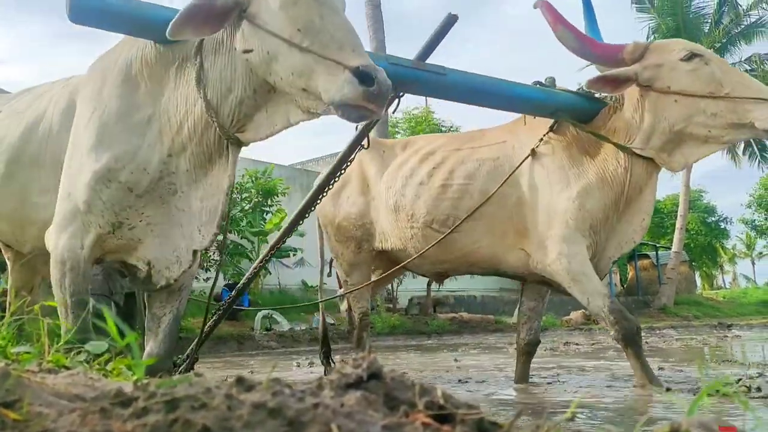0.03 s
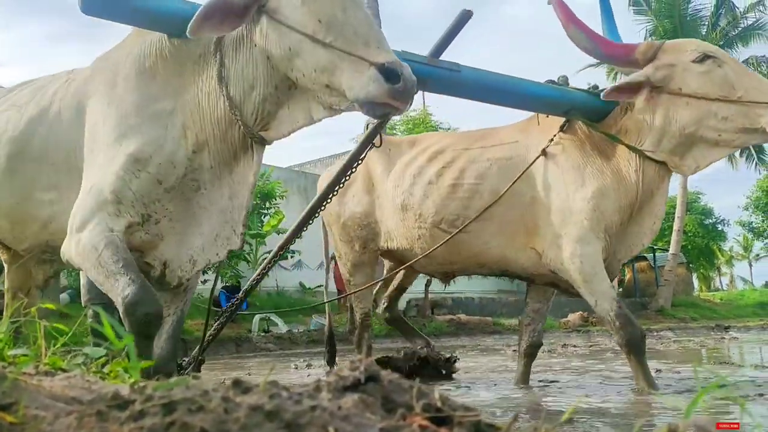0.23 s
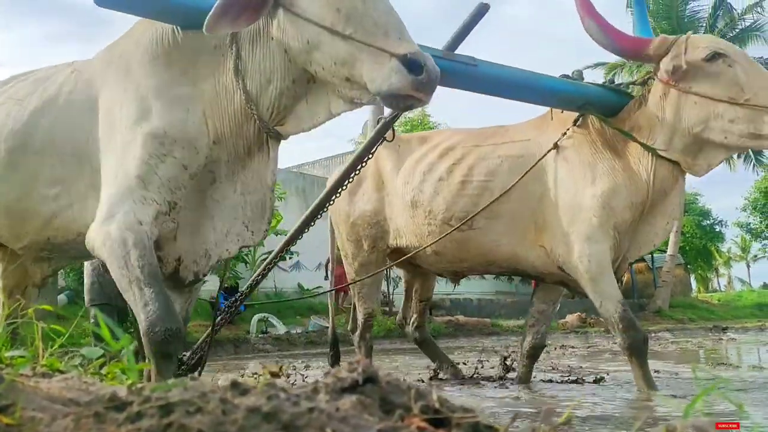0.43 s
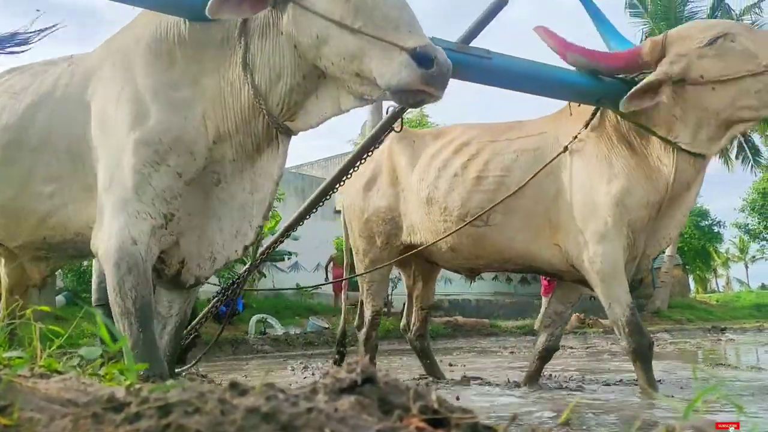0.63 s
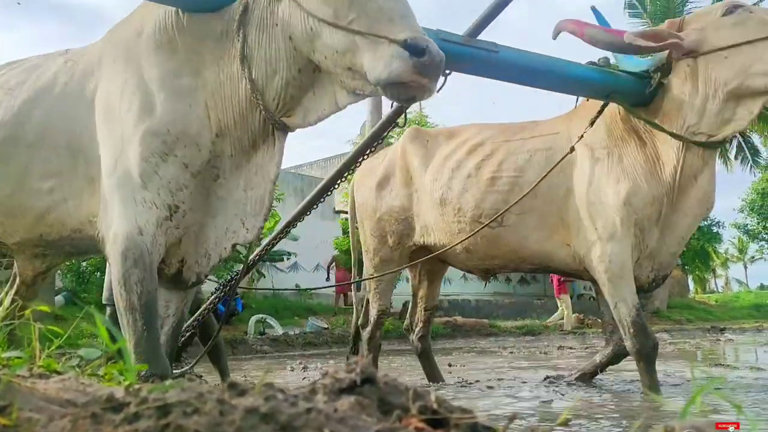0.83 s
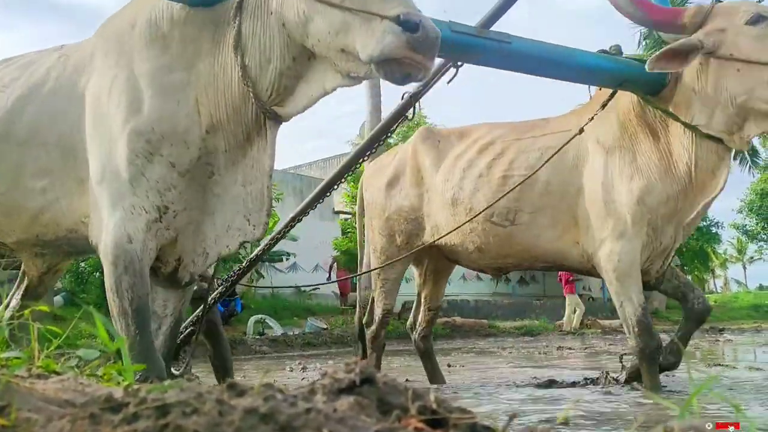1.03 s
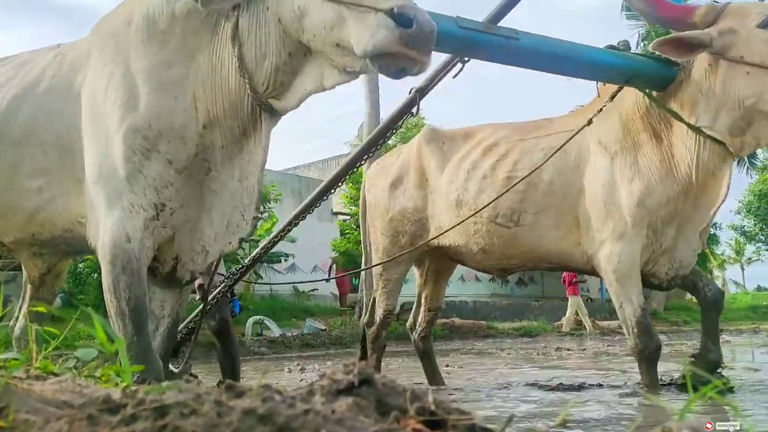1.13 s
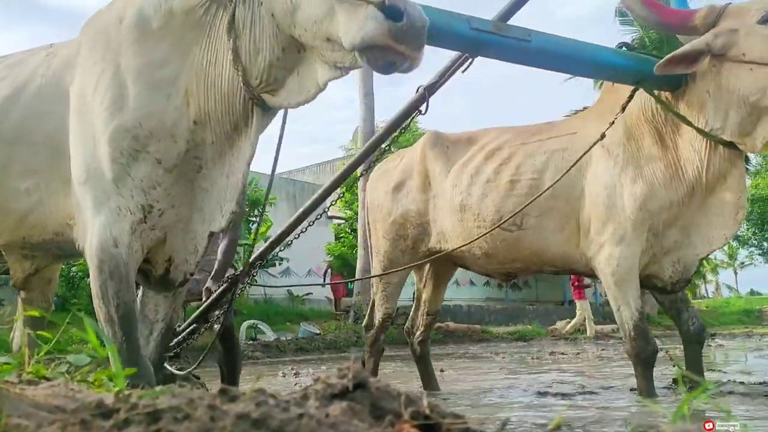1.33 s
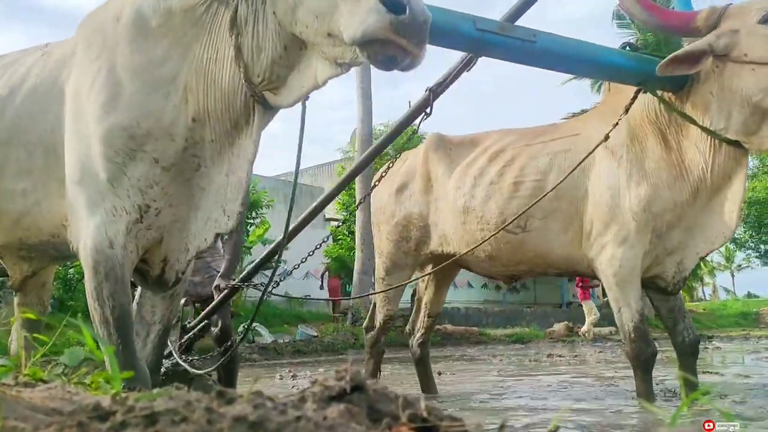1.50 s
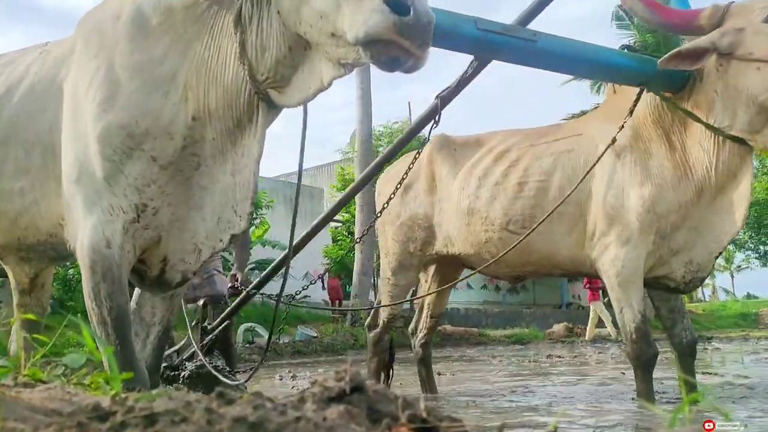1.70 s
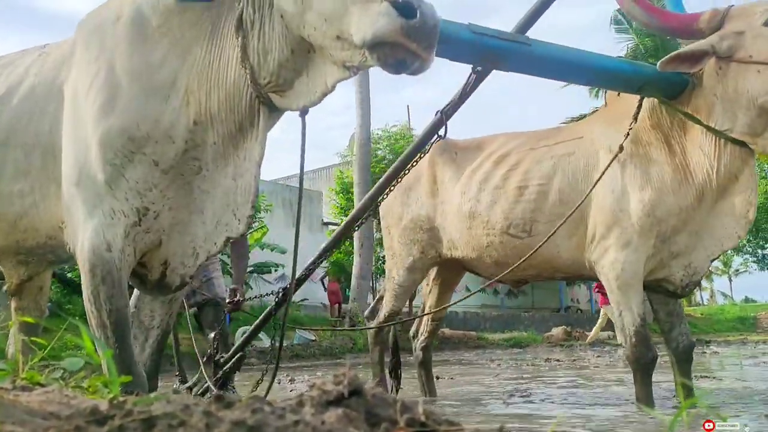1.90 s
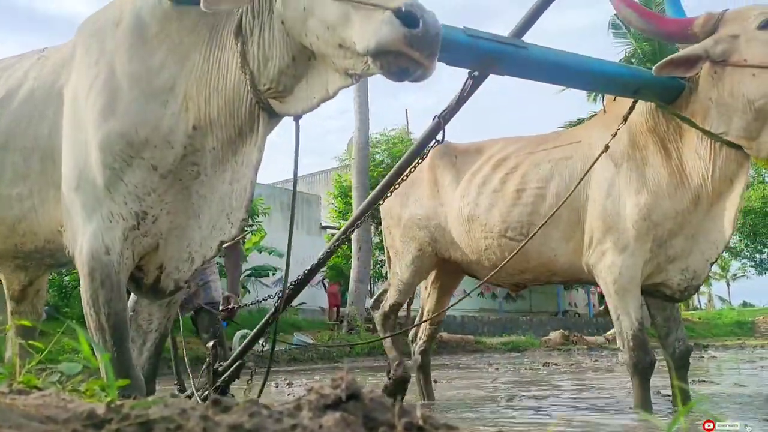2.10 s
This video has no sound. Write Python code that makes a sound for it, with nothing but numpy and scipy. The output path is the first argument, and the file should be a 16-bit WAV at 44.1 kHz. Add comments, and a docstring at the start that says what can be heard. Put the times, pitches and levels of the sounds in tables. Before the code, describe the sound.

Oxen step through watery mud with a gulping squelch, a dull knock and clinking chain.

```python
"""Yoked oxen in a flooded field

A hoof pulls out of mud: suction lets go in dull gulps, water sloshes back. The wooden yoke
knocks on its low modes; a soft low boop follows. Steel chain links clink and rub, wet mud slaps
down close by. Small plops over stirred water. Behind: high hiss on the left, a little wind."""
import sys
import numpy as np
from scipy import signal
from scipy.fft import rfft, irfft, next_fast_len
from scipy.io import wavfile
from scipy.ndimage import map_coordinates

SR = 44100
rng = np.random.default_rng(int(sys.argv[2]) if len(sys.argv) > 2 else 0)


def persist_wave(psi):
    """Save psi, clipped to +-1, as 16-bit WAV."""
    counts = np.round(np.clip(psi, -1, 1) * 32767).astype(np.int16)
    wavfile.write(sys.argv[1], SR, np.atleast_2d(counts).T)


N = 94815

# suction releases (time [s], level [dB], pitch [Hz])
GULPS = [(0.2388, -22.5, 504), (.2512, -15.5, 686), (0.258, -15.5, 419), (0.2622, -8, 502),
         (.268, -14.5, 546), (0.2776, -21, 430), (.298, -23.5, 713), (.475, -31.5, 556)]
# mud hollow resonances (centre [Hz], width [Hz], gain [dB])
HOLLOW_MODES = [(297, 41, 1), (496, 73, 0.5), (732, 76, -11), (1090, 45, -18), (1730, 330, -22)]
# returning water (frequency [Hz], gain [dB])
SLOSH_SPECTRUM = [(100, -46), (230, -18.5), (330, -3), (450, -5), (560, 1.5), (700, -1.5), (900, -19),
                  (3000, -52)]
# hoof spray (frequency [Hz], gain [dB])
SPRAY_SPECTRUM = [(300, -29), (1200, 17.5), (1800, 0), (2600, 4.5), (5400, -0.5), (8000, -5), (14700, -8),
                  (15300, -65)]
# wooden beam (frequency [Hz], gain [dB], t60 [s])
YOKE_MODES = [(165, -8.5, 0.13), (203.4, -18, 0.16), (296, -1.5, 0.082), (387, -10.5, 0.043),
              (470, -7, 0.1), (586, -18, 0.07), (814.5, -12.5, 0.083)]
# yoke impact noise (frequency [Hz], gain [dB])
THUD_SPECTRUM = [(100, -39), (220, 6), (400, 3.5), (1200, -11.5), (2000, -24), (3000, -32), (7500, -33),
                 (9000, -66.5)]
# link contacts (time [s], relative level [dB])
CLINKS = [(0.6571, -23), (1.05, -43), (1.825, -37.5), (1.884, -23.5), (1.8876, -18.5), (1.899, -28)]
# steel links (frequency [Hz], gain [dB], t60 [s])
LINK_MODES = [(2030, -21.5, 0.061), (4377, -23.5, 0.3), (5207, -3.5, 0.11), (5300, -7, 0.088),
              (5350, -16, 0.058), (5930, -20.5, 0.075), (7200, -18.5, 0.057), (7640, -31, 0.12)]
# link contact noise (frequency [Hz], gain [dB])
TICK_SPECTRUM = [(1000, -16.5), (2100, -17), (3000, -17.5), (4500, -1.5), (5900, -1.5), (6700, 3.5),
                 (7600, 1.5), (8400, -19.5)]
# links sliding (time [s], relative level [dB])
RUB_LEVEL = [(.62, -72), (.645, -38.5), (.67, -32), (.78, -72), (1.33, -69), (1.43, -50), (1.58, -43),
             (1.65, -52), (1.85, -45.5), (1.88, -23.5), (1.93, -41.5), (1.98, -47), (2.05, -66)]
# ring of sliding links (frequency [Hz], gain [dB])
RUB_SPECTRUM = [(4000, -38), (4380, -20.5), (4600, -35.5), (5020, -18.5), (5120, 1), (5230, -8),
                (5450, -12.5), (5800, -26), (8300, -46.5)]
# mud landings (time [s], level [dB], crack length [s], crack pitch [Hz])
SLAPS = [(1.4934, -16.5, 0.0028, 8820), (1.5397, -30.5, 0.0037, 8000), (1.5942, -16.5, 0.0036, 8450)]
# mud crack (frequency [x crack pitch], gain [dB])
CRACK_SPECTRUM = [(.12, -15.5), (.27, -22.5), (.48, -10), (.56, -13.5), (.66, -10), (.76, -12.5),
                  (.88, -10.5), (1, 5.5), (1.1, -4), (1.3, -7.5), (1.6, -12), (1.85, -31.5)]
# knock under each crack (frequency [Hz], gain [dB], t60 [s])
SLAP_MODES = [(342, -15, 0.029)]
# mud spatter (frequency [Hz], gain [dB])
SPATTER_SPECTRUM = [(300, -3.5), (1300, -12), (2300, 2), (2900, -6.5), (4000, -14), (15000, -25.5)]
# puddle plops; lowest row: soft boop just after the yoke's knock (time [s], level [dB], pitch [Hz])
PLOPS_AND_BOOP = [(.093, -37, 645), (.379, -33.5, 1047), (0.6, -36, 866), (.699, -37.5, 170.4),
                  (.867, -38.5, 820), (1.03, -38.5, 1145), (1.073, -33, 852), (1.152, -34.5, 993),
                  (1.513, -28.5, 940), (1.523, -29.5, 995), (1.583, -31, 920), (1.664, -40.5, 900),
                  (1.677, -36, 970), (1.7765, -29, 875), (1.827, -36.5, 396), (1.869, -33.5, 800),
                  (1.887, -31.5, 617)]
# splash around a plop (frequency [Hz], gain [dB])
SPLASH_SPECTRUM = [(150, -14), (350, 2), (1000, 2.5), (1500, -12.5), (2200, -10), (6000, -19), (8500, -58)]
# stirred water (time [s], level [dB])
WATER_LEVEL = [(0, -51), (.8, -51.5), (.97, -52.5), (1.12, -51.5), (1.33, -55.5), (1.5, -49), (1.72, -51.5),
               (1.88, -45.5), (2.02, -55), (2.15, -54.5)]
# water wash (frequency [Hz], gain [dB])
WASH_SPECTRUM = [(60, 0), (150, -9), (290, -8), (450, -8), (800, -1.5), (1050, -4.5), (1400, -17.5),
                 (2200, -16.5), (3000, -32.5), (7000, -36), (8300, -77.5)]
# high hiss (time [s], level [dB])
HISS_LEVEL = [(0, -50.5), (.2, -47.5), (.58, -46.5), (.85, -51), (1.17, -47.5), (1.45, -56), (1.68, -54),
              (1.8, -48.5), (2.15, -55.5)]
# hiss, left ear (frequency [Hz], gain [dB])
HISS_LEFT_SPECTRUM = [(1500, -10), (3000, -12), (3800, -3.5), (4500, 2.5), (5200, 0), (5900, -10),
                      (6500, -35), (7700, -22.5), (8200, -80.5)]
# hiss, right ear (frequency [Hz], gain [dB])
HISS_RIGHT_SPECTRUM = [(2000, -6.5), (4500, -11), (5900, -6.5), (7000, -1), (7700, -4.5), (8200, -69.5)]
# gusts (time [s], relative level [dB])
WIND_LEVEL = [(0, -49), (.35, -42), (.55, -54.5), (.77, -43.5), (1.25, -46.5), (1.38, -36.5), (1.46, -42.5),
              (1.85, -49.5), (1.98, -38), (2.15, -45.5)]
# wind rumble (frequency [Hz], gain [dB])
WIND_SPECTRUM = [(15, 5), (35, 7), (55, 2.5), (90, -7.5), (130, -11.5), (3000, -110)]
# echo off banks and a wall (frequency [Hz], t60 [s])
ECHO_DECAY = [(150, 0.19), (5000, .18), (9000, 0.095), (16000, 0.061)]


def amp(db):
    """Decibels to gain."""
    return 10 ** (np.asarray(db) / 20)


def unit(x):
    """Scale to rms 1."""
    return x / np.sqrt(np.mean(x ** 2) + 1e-20)


def along(points, hz):
    """Interpolate (frequency [Hz], value) on a log axis."""
    knots_hz, values = np.transpose(points)
    return np.interp(np.log(hz + 1), np.log(knots_hz + 1), values)


def clock():
    """Sample times [s]."""
    return np.arange(N) / SR


def curve(rows):
    """Interpolate (time [s], value) linearly."""
    return np.interp(clock(), *np.transpose(rows))


def wobble(rate_hz):
    """Smooth random curve with knots at rate_hz."""
    return map_coordinates(rng.standard_normal(1000), [clock() * rate_hz], mode="wrap")


def filtered(x, response):
    """Apply a complex frequency response."""
    size = next_fast_len(N + 8192)
    return irfft(rfft(x, size) * response(np.fft.rfftfreq(size, 1 / SR)), size)[..., :N]


def noise(spectrum, corr):
    """Coloured stereo noise, rms 1, left-right correlation corr."""
    mid, side = filtered(rng.standard_normal((2, N)), lambda hz: amp(along(spectrum, hz)))
    angle = np.arccos(np.clip(corr, -1, 1)) / 2
    mid, side = np.cos(angle) * mid, np.sin(angle) * side
    return unit(np.array([mid + side, mid - side]))


def pan(x, left_db, lead_ms=0):
    """Level and arrival difference; positive is left."""
    side = np.array([[.5], [-.5]])
    return filtered(x, lambda hz: amp(left_db * side) * np.exp(2j * np.pi * hz * side * lead_ms / 1000))


def add(track, start_s, sound):
    """Mix in at start_s."""
    part = track[..., round(start_s * SR):][..., :sound.shape[-1]]
    part += sound[..., :part.shape[-1]]


def fade(t60_s, attack_s):
    """Quick rise, exponential decay."""
    t = clock()[:SR // 3]
    return 1000 ** (-t / t60_s) * (1 - np.exp(-t / attack_s))


def bursts(rows, attack_s):
    """Envelope from (time [s], level [dB], t60 [s])."""
    envelope = np.zeros(N)
    for s, db, t60_s in rows:
        add(envelope, s, amp(db) * fade(t60_s, attack_s))
    return envelope


def ring(modes, scatter_db, detune, attack_s):
    """One randomised blow on modes (frequency [Hz], gain [dB], t60 [s])."""
    t = clock()[:SR // 3]
    blow = np.zeros(len(t))
    for (hz, db, t60_s), (gain_draw, pitch_draw) in zip(modes, rng.standard_normal((len(modes), 2))):
        tone = np.sin(2 * np.pi * hz * (1 + detune * pitch_draw) * t)
        blow += amp(db + scatter_db * gain_draw) * fade(t60_s, attack_s) * tone
    return blow


def echo(x, wet_db):
    """Add the field's short diffuse echo, different in each ear."""
    hz, t, spectra = signal.stft(rng.standard_normal((2, SR // 3)), SR, nperseg=256)
    decay = 1000 ** (-t / along(ECHO_DECAY, hz)[:, None])
    tail = signal.istft(spectra * decay, SR, nperseg=256)[1]
    tail /= np.linalg.norm(tail[0])
    return x + amp(wet_db) * signal.fftconvolve(np.atleast_2d(x), tail, axes=1)[:, :N]


def hoof(peak_s=0.26, rise_db_per_s=320, gulp_rise_s=0.0023, push_s=0.271, push_width_s=0.01):
    """Suction builds and lets go in gulps, the hollow churns, water sloshes back."""
    def swell(fall_db_per_s):
        t = clock() - peak_s
        onset = np.clip((clock() - .197) / 0.022, 0, 1)
        return amp(np.minimum(rise_db_per_s * t, -fall_db_per_s * t)) * onset

    def hollow(hz):
        return sum((-1) ** k * amp(db) * 1j * hz * width / (centre ** 2 - hz ** 2 + 1j * hz * width)
                   for k, (centre, width, db) in enumerate(HOLLOW_MODES))

    gulps, age_s = np.zeros(N), clock()[:SR // 20]
    envelope = (age_s / gulp_rise_s * np.exp(1 - age_s / gulp_rise_s)) ** 2
    for s, db, hz in GULPS:
        add(gulps, s, amp(db) * envelope * np.sin(2 * np.pi * hz * age_s))
    flow = noise([(1800, -13), (4000, -4.5)], corr=0.64)
    churn = amp(-21.5) * swell(460) * unit(filtered(flow, hollow))
    slosh = amp(-28 + 0.55 * wobble(70)) * swell(91.5) * noise(SLOSH_SPECTRUM, corr=0.72)
    spray = amp(-41 + 0.9 * wobble(400)) * swell(214) * noise(SPRAY_SPECTRUM, corr=0.99)
    mud = pan(gulps + churn + slosh, left_db=-3.5, lead_ms=-0.1)
    # low shove through the ground
    lag_s = clock() - push_s
    push = -amp(-18.5) * np.exp(-(lag_s / push_width_s) ** 2) * np.sin(2 * np.pi * 40.3 * lag_s)
    return mud + spray + pan(push, left_db=6, lead_ms=-4)


def yoke(knock_s=0.6238, rise_cycles=2.6):
    """Dull knock on the wooden beam; lower modes build more slowly."""
    wood = np.zeros(N)
    for mode in YOKE_MODES:
        tone = ring([mode], scatter_db=3.5, detune=0.0013, attack_s=rise_cycles / mode[0])
        add(wood, knock_s, amp(-11) * tone)
    thud = bursts([(knock_s, -20, .11)], attack_s=0.001) * noise(THUD_SPECTRUM, corr=0.87)
    return pan(echo(wood + thud, wet_db=-27), left_db=2.5, lead_ms=0.13)


def chain(cutoff_hz=8200):
    """Steel links ring and slide on the left; their ticks lean right."""
    links = np.zeros((2, N))
    for s, db in CLINKS:
        ears = [ring(LINK_MODES, scatter_db=4, detune=0.00055, attack_s=0.00035) for _ in range(2)]
        add(links, s, amp(db - 6) * np.array(ears))
    tick_envelope = bursts([(s, db - 6, .022) for s, db in CLINKS], attack_s=0.00045)
    ticks = tick_envelope * noise(TICK_SPECTRUM, corr=-0.38)
    rub = amp(curve(RUB_LEVEL) - 8 + 2.5 * wobble(90)) * noise(RUB_SPECTRUM, corr=.1)
    jingle = echo(pan(links + rub, left_db=16) + pan(ticks, left_db=-5.5), wet_db=-15)
    return filtered(jingle, lambda hz: 1 / (1 + (hz / cutoff_hz) ** 30))


def mud_slaps(crackle_db=4, crack_rise_s=0.00083, spatter_db=-30, spatter_t60_s=0.037):
    """Wet mud lands: a pitched crack of tiny snaps, a low knock, a duller spatter."""
    cracks, knocks, t = np.zeros((2, N)), np.zeros(N), clock()[:SR // 20]
    for s, db, length_s, hz in SLAPS:
        grit = noise([(hz * ratio, gain) for ratio, gain in CRACK_SPECTRUM], corr=0.79)[:, :len(t)]
        crackle = amp(crackle_db * np.clip(wobble(1770)[:len(t)], -1, 1))
        envelope = np.exp(-(t / length_s) ** 2) * (1 - np.exp(-t / crack_rise_s))
        add(cracks, s, amp(db) * envelope * crackle * grit)
        add(knocks, s, amp(db) * ring(SLAP_MODES, scatter_db=1.5, detune=.05, attack_s=.0005))
    landings = [(s + length_s / 2, spatter_db, spatter_t60_s) for s, _, length_s, _ in SLAPS]
    spatter = bursts(landings, attack_s=0.00055) * noise(SPATTER_SPECTRUM, corr=0.39)
    return echo(cracks + knocks + spatter, wet_db=-17.5)


def plops_and_boop(t60_cycles=24.3, rise_cycles=0.77):
    """Puddle plops and one soft low boop: brief tones in splashy noise, lower ones ring longer."""
    tones = np.zeros(N)
    for s, db, hz in PLOPS_AND_BOOP:
        t60_s = t60_cycles / hz
        modes = [(hz, 2.5, t60_s), (hz * 1.18, -7, t60_s), (hz * 0.87, -8, t60_s)]
        add(tones, s, amp(db) * ring(modes, scatter_db=1.5, detune=0.011, attack_s=rise_cycles / hz))
    envelope = bursts([(s, db, .055) for s, db, _ in PLOPS_AND_BOOP], attack_s=.001)
    splash = 0.42 * envelope * noise(SPLASH_SPECTRUM, corr=0.56)
    return pan(echo(tones + splash, wet_db=-10), left_db=1, lead_ms=-0.12)


def water(bubble_count=170, lowest_hz=600):
    """Stirred water: a restless wash with tiny bubbles."""
    bubbles = np.zeros(N)
    for when, octaves, faintness in rng.random((bubble_count, 3)):
        bubble = ring([(lowest_hz * 2 ** octaves, 0, .025)], scatter_db=-5, detune=0, attack_s=0.0018)
        add(bubbles, when * N / SR, amp(-11 * faintness) * bubble)
    wash = amp(2.54 * wobble(44.91)) * noise(WASH_SPECTRUM, corr=0.88)
    stirred = amp(curve(WATER_LEVEL)) * (wash + amp(-5.5) * unit(bubbles))
    return pan(stirred, left_db=2.5, lead_ms=-0.067)


def hiss(right_db=-8.5):
    """Flickering hiss, higher and weaker on the right."""
    left = noise(HISS_LEFT_SPECTRUM, corr=0.94)[0]
    right = amp(right_db) * noise(HISS_RIGHT_SPECTRUM, corr=0.99)[0]
    return amp(curve(HISS_LEVEL) + 2 * wobble(110)) * np.array([left, right])


def wind():
    """Light gusts rumble on the microphone."""
    gusts = amp(curve(WIND_LEVEL) - 4.5 + 1.5 * wobble(17))
    return pan(gusts * noise(WIND_SPECTRUM, corr=.25), left_db=2.5)


def scene():
    """Stereo sum of all sources."""
    return hoof() + yoke() + chain() + mud_slaps() + plops_and_boop() + water() + hiss() + wind()


def record(dry):
    """Brick-wall low-pass."""
    return filtered(dry, lambda hz: hz < 16470)


dry = scene()
out = record(dry)
persist_wave(out)
```